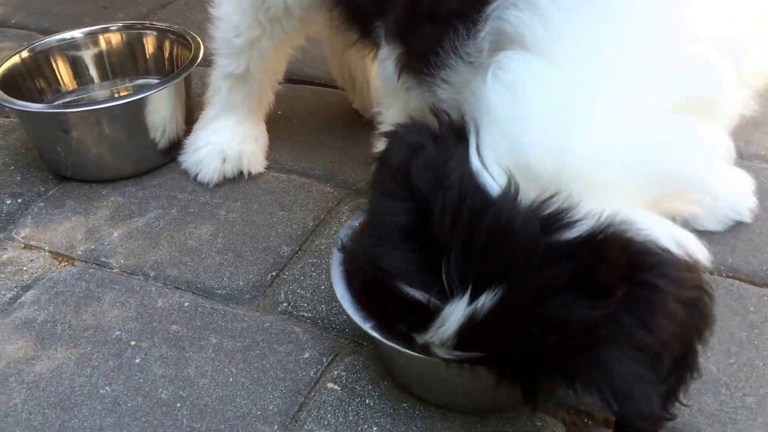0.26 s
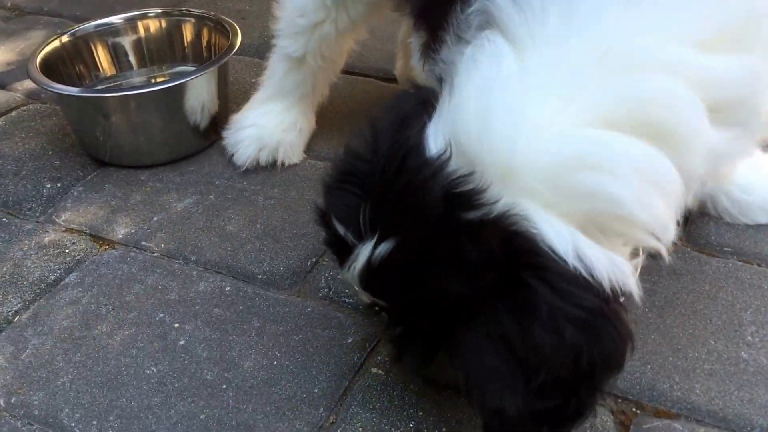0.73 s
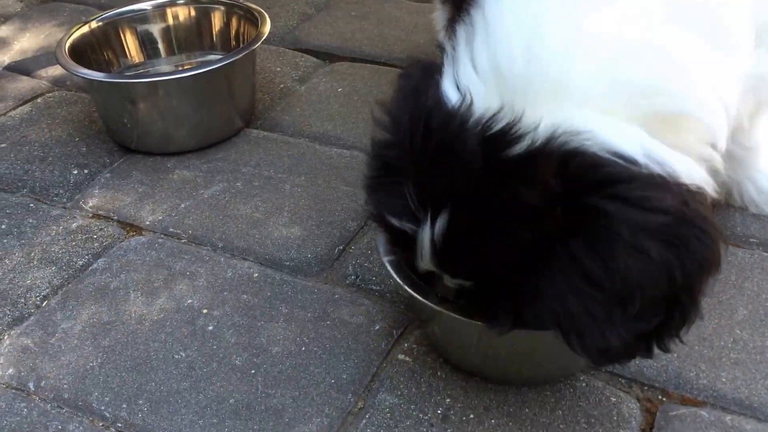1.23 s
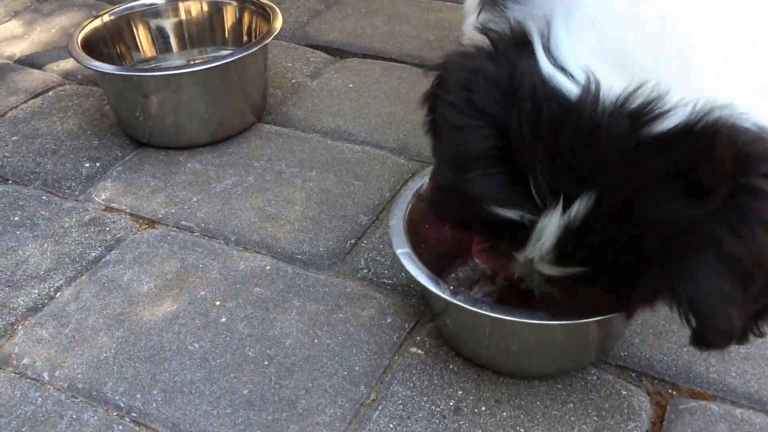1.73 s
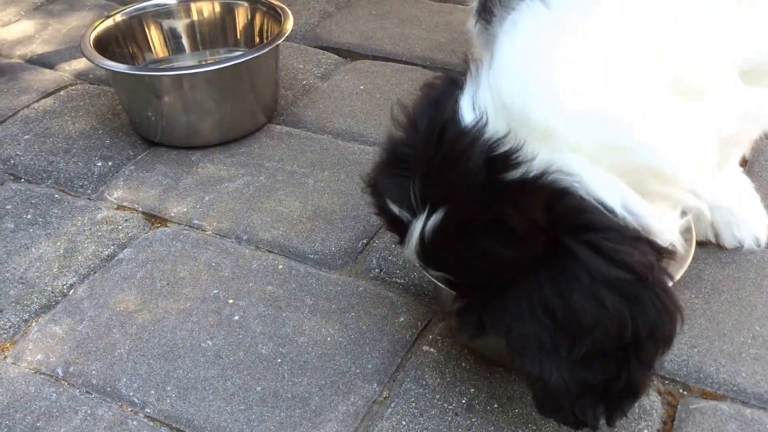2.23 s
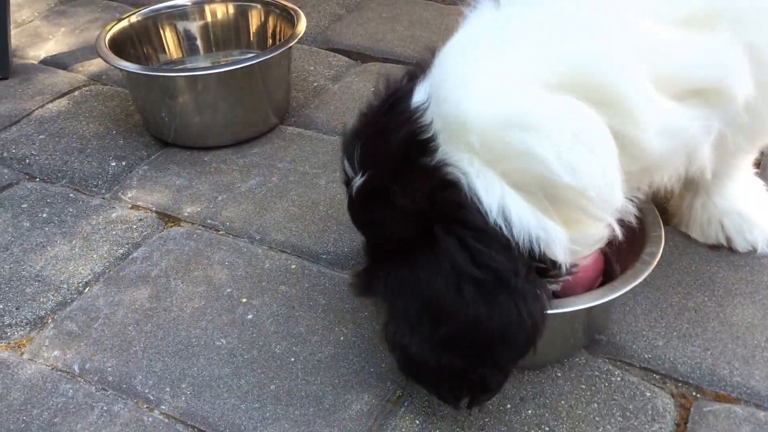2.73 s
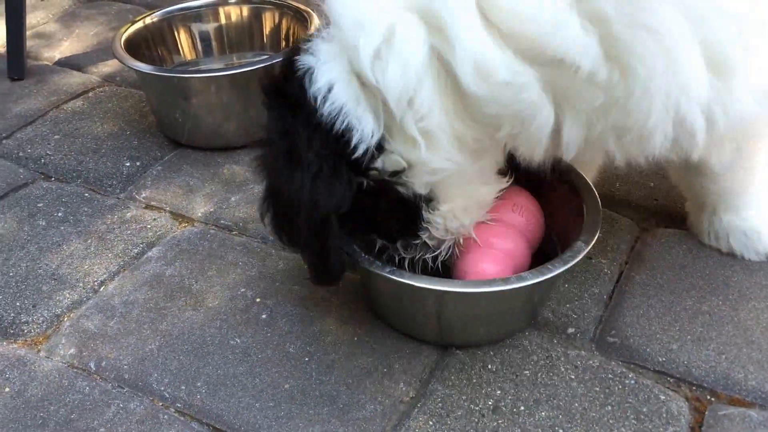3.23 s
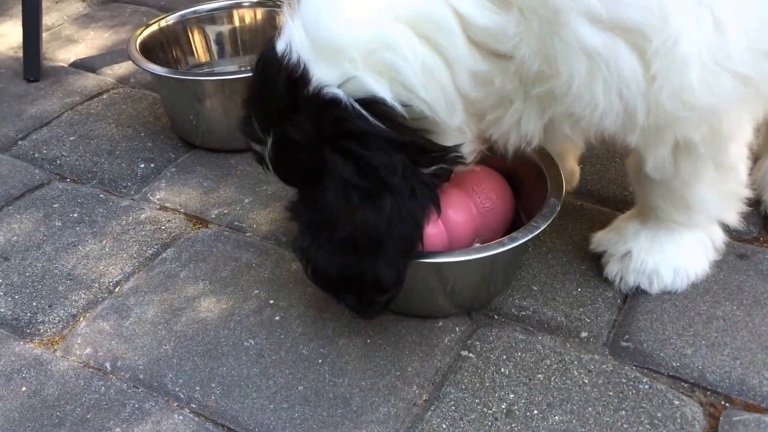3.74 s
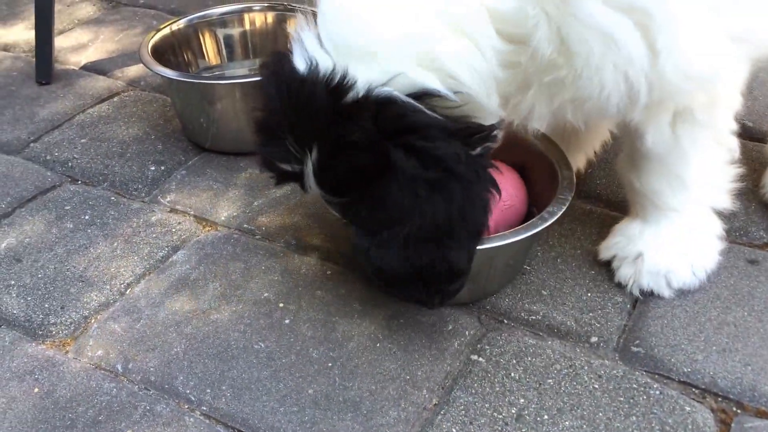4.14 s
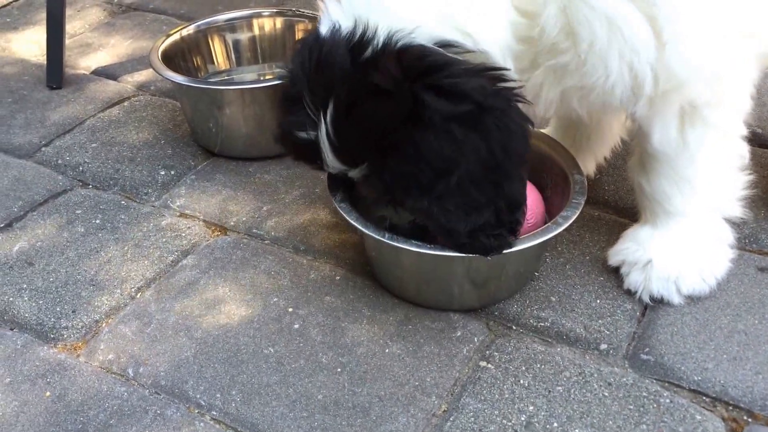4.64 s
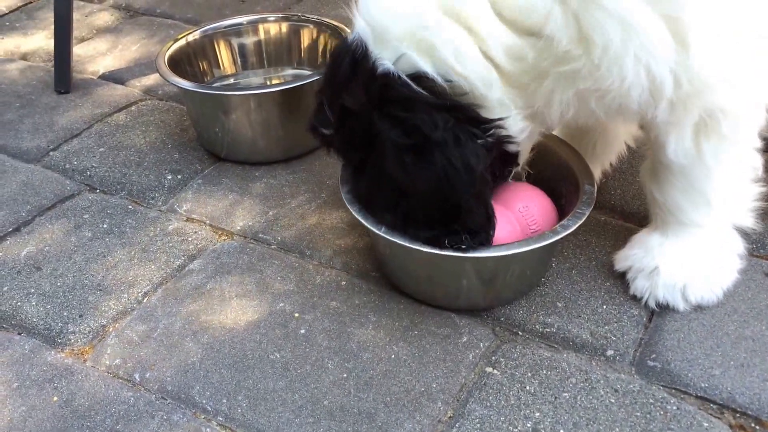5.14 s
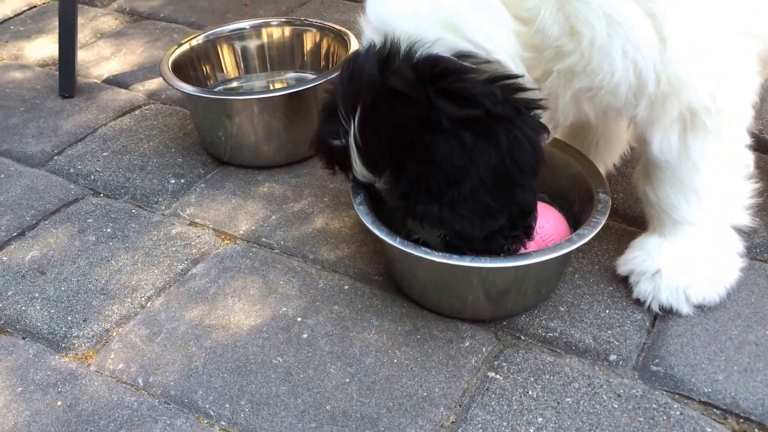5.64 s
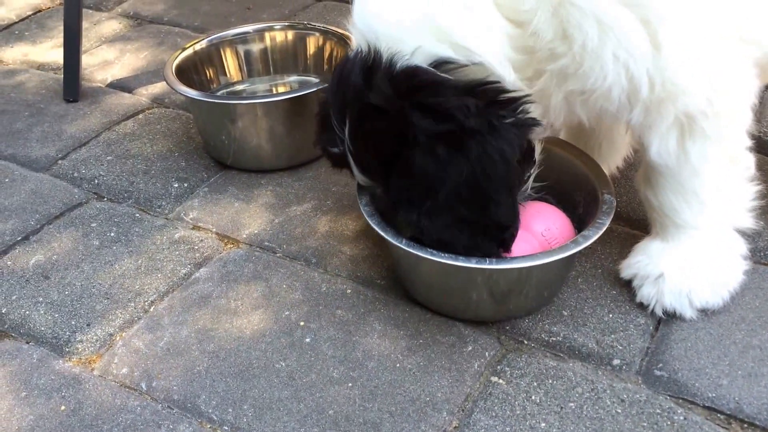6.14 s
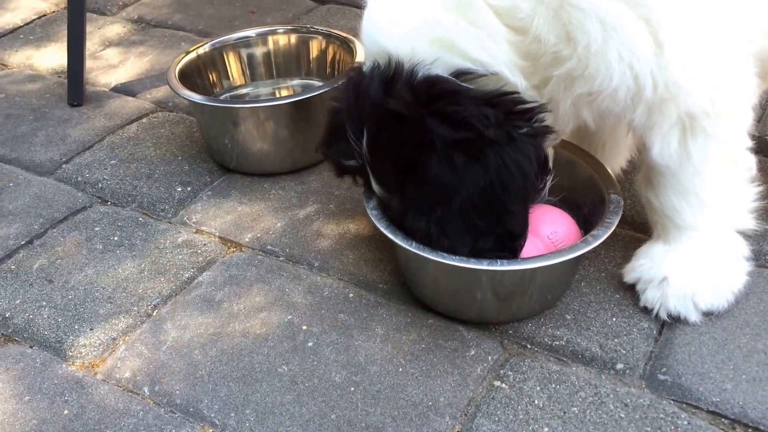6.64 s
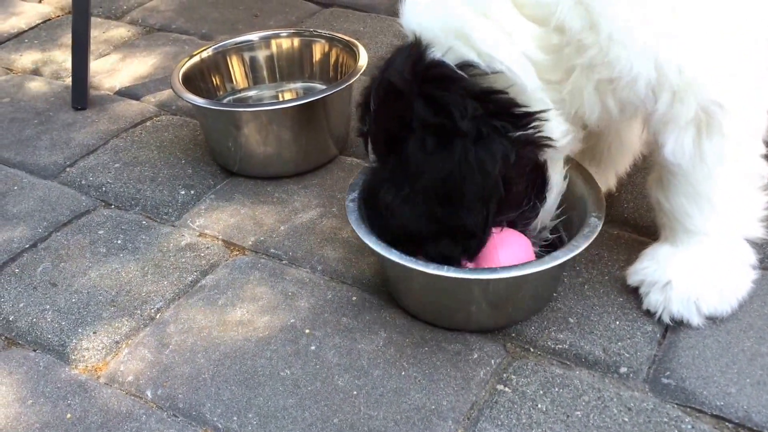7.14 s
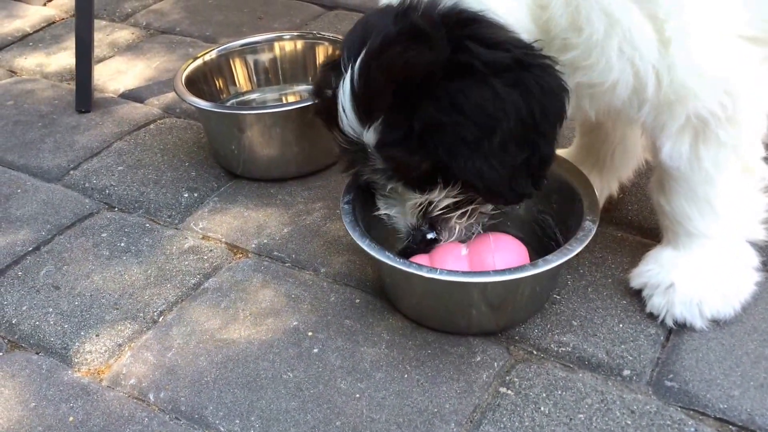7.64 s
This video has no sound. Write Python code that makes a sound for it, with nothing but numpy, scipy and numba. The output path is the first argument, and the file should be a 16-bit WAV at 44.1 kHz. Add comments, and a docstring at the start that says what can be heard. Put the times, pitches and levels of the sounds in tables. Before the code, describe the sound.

A thin metal bowl scrapes and clatters over rough paving as a puppy eats, with knocks, tiny wet licks and a faint distant drone outdoors.

```python
"""On a paved patio a puppy eats from a thin steel bowl, a metre from a hand-held phone.
Its muzzle shoves the bowl over rough stone: noise from ticking grains drives the bowl's modes.
Kibble, teeth and a toy knock the wall: impulses ring the same modes under a short noisy crack.
Dull bumps are low damped swings, licks are tiny decaying sines, a wet slide is swept narrow noise.
Behind it a distant machine drones over suburban air: filtered noise with a puff of wind in the bass."""
import sys
import numpy as np
from scipy import signal
from scipy.fft import rfft, irfft
from scipy.io import wavfile
from scipy.ndimage import uniform_filter1d
from numba import njit

SR = 44100
rng = np.random.default_rng(int(sys.argv[2]) if len(sys.argv) > 2 else 0)


def volts_from_decibels(level):
    """Turn decibel levels (scalar or array-like) into linear amplitude factors."""
    exponent = np.asarray(level, float) / 20
    return 10 ** exponent


def transcribe(u):
    """Save the signal u as a 16-bit wav file named by the first command-line argument.

    u: samples, shape (n,) or (channels, n), limited to [-1, 1]; the rate is SR.
    q: integer samples, one column per channel.
    """
    v = np.clip(np.atleast_2d(u).T, -1, 1)
    q = np.round(v * 32767).astype(np.int16)
    wavfile.write(sys.argv[1], SR, q)


N = 347508
T = np.arange(N) / SR  # s


def level(x, db):
    """Scale to an rms level."""
    return x * volts_from_decibels(db) / np.sqrt(np.mean(x ** 2))


def band(x, lo_hz, hi_hz):
    """Steep band-pass."""
    return signal.sosfilt(signal.butter(3, [lo_hz, hi_hz], "bandpass", fs=SR, output="sos"), x)


def ring(x, hz, t60):
    """One damped mode; a unit impulse starts a sine that falls by 60 dB in t60 seconds."""
    radius = np.exp(-np.log(1000) / (t60 * SR))
    angle = 2 * np.pi * hz / SR
    return signal.lfilter([np.sin(angle)], [1, -2 * radius * np.cos(angle), radius ** 2], x)


@njit
def resonance(x, hz, width):
    """State-variable band-pass with a moving centre, gain 1 there."""
    y = np.empty(len(x))
    band_state, low_state = 0., 0.
    for i in range(len(x)):
        g = np.tan(np.pi * hz[i] / SR)
        k = width / hz[i]
        v = (band_state + g * (x[i] - low_state)) / (1 + g * (g + k))
        band_state = 2 * v - band_state
        low_state = low_state + 2 * g * v
        y[i] = k * v
    return y


def walk(rate):
    """Random levels held 1 / rate s and slewed twice; spread near 1."""
    hold = int(SR / rate)
    steps = np.repeat(rng.standard_normal(N // hold + 1), hold)
    slewed = uniform_filter1d(uniform_filter1d(steps, hold), hold)
    return slewed[:N] * np.sqrt(2)


def turns(spread_db, rate, count):
    """Gains that take turns: each wanders alone, their summed power stays even."""
    gains = np.array([volts_from_decibels(spread_db * walk(rate)) for _ in range(count)])
    return gains / np.sqrt(np.mean(gains ** 2, axis=0))


# spectral shape of the distant air noise: [f/Hz, relative level per Hz/dB]
AIR_SPECTRUM = [(15, -65.5), (25, -23), (71, -6.5), (172, -6.5), (293, -14.5), (344, -14.5), (475, -22),
                (691, -26), (978, -25.5), (1180, -28), (1390, -27.5), (1960, -31.5), (3830, -46),
                (5720, -48.5), (15000, -54)]
# rough hum bands of the machine, before the swells: [f/Hz, width/Hz, level/dB]
HUM_BANDS = [(85, 10, -58.5), (123.55, 14, -60.5)]
# distant traffic swells and sinks: [t/s, level/dB]
TRAFFIC_SWELL = [(0.0, -0.5), (1.47, 2.5), (2.02, -1), (2.5, 1.5), (3.45, 1.5), (4.61, -2), (6.1, -1),
                 (6.69, 4), (6.89, 0), (7.88, -1)]
# the far machinery's bass comes and goes on its own: [t/s, level/dB]
BASS_SWELL = [(0.0, 1.5), (1.5, 1.5), (2.0, -4.5), (2.5, -9), (2.9, -4.5), (3.2, 0.5), (3.6, -1.5),
              (4.6, 2), (6.1, -0.5), (7.88, 2.5)]
# puff of wind on the microphone: [start t/s, attack/s, hold/s, release/s, bass rise level/dB]
WIND_PUFF = (2.53, 0.062, .08, 0.081, 15)


def air(noise_db=-51.5, split_hz=170):
    """Distant traffic and machinery: coloured noise and hum; hiss and bass swell apart, a gust lifts the bass."""
    hz, db = np.transpose(AIR_SPECTRUM)
    f = np.arange(N // 2 + 1) * SR / N
    colour = volts_from_decibels(np.interp(np.log(f + 1), np.log(hz), db))
    noise = irfft(rfft(rng.standard_normal(N)) * colour, N)
    hum = sum(level(band(rng.standard_normal(N), hz - w / 2, hz + w / 2), db) for hz, w, db in HUM_BANDS)
    far = level(noise, noise_db) + hum
    rumble = signal.sosfiltfilt(signal.butter(2, split_hz, fs=SR, output="sos"), far)
    hiss = far - rumble
    swell_db = np.interp(T, *np.transpose(TRAFFIC_SWELL))
    bass_db = np.interp(T, *np.transpose(BASS_SWELL))
    rise_db = WIND_PUFF[4]
    gust_db = np.interp(T, np.cumsum(WIND_PUFF[:4]), [0, rise_db, rise_db, 0])
    return hiss * volts_from_decibels(swell_db) + rumble * volts_from_decibels(bass_db + gust_db)


# wet slide along the wall, falling in pitch: [start t/s, length/s, from f/Hz, to f/Hz, level/dB]
WET_SLIDE = (0.415, 0.05, 2700, 1700, -43)


def slide(width_hz=300.0):
    """Rubbing noise in one narrow resonance that sweeps down."""
    s, length, from_hz, to_hz, db = WET_SLIDE
    along = np.clip((T - s) / length, 0, 1)
    rub = resonance(rng.standard_normal(N), from_hz * (to_hz / from_hz) ** along, width_hz)
    rub = rub * np.sqrt(SR / np.pi / width_hz)  # make up for the narrow band
    return rub * volts_from_decibels(db) * np.sin(np.pi * along)


# the clearest smacks of tongue and lips: [t/s, starting level/dB, f/Hz]
CLEAR_SMACKS = [(0.953, -44.5, 2760), (4.196, -33.5, 2960), (4.637, -45.5, 3810), (5.946, -43, 3110),
                (7.085, -46.5, 4500), (7.107, -41.5, 2300), (7.365, -49.5, 2610)]


def licks(per_s=11.0, lick_db=-59.0, spread_db=4.0, cycles=2.6):
    """Wet ticks of tongue and lips, each a few cycles long: clear smacks among many tiny random ones."""
    when, pitch, size = rng.random((200, 3))[:int(per_s * N / SR)].T
    tiny = np.transpose([when * N / SR, lick_db - spread_db * np.log(size), 2500 * 4.0 ** pitch])
    out = np.zeros(N + 256)
    for s, db, hz in [*CLEAR_SMACKS, *tiny]:
        at = int(s * SR)
        tick = np.sin(2 * np.pi * hz * T[:256]) * np.exp(-T[:256] * hz / cycles)
        out[at:at + 256] += tick * volts_from_decibels(db)
    return out[:N]


# dull bumps of bowl, toy and phone: [t/s, level of the impulse/dB, f/Hz, t60/s]
DULL_BUMPS = [(2.589, -28.5, 104, 0.078), (2.619, -36, 91, 0.06), (2.648, -21.5, 85, 0.024),
              (2.691, -45, 80, .08), (2.721, -35, 90, .08), (2.761, -38, 350, 0.056),
              (2.843, -29, 488, 0.12), (2.902, -28, 368, 0.029), (3.061, -38.5, 346, 0.077),
              (3.426, -32.5, 266, 0.057), (3.514, -26.5, 408, 0.15), (3.522, -27, 528, 0.08),
              (5.55, -36, 342, 0.13), (7.127, -26.5, 345, 0.053)]


def bumps():
    """Soft contacts: a slightly blunted impulse starts one low, quickly damped swing each."""
    out = 0
    for s, db, hz, t60 in DULL_BUMPS:
        blow = np.zeros(N)
        blow[int(s * SR)] = volts_from_decibels(db)
        out = out + ring(uniform_filter1d(blow, size=48), hz, t60)
    return out


# modes of the bowl, t60 before knocks and scraping shorten it: [f/Hz, relative level/dB, t60/s]
BOWL_MODES = [(598.6, 3, 0.037), (652, 5, 0.044), (772, -0.5, 0.041), (900, 7.5, 0.044), (1015, -6, 0.11),
              (1210, 5, 0.024), (1350, -1, 0.021), (1477, -6, .08), (1545, 2.5, 0.075), (1635, -4, 0.26),
              (1720, 2, 0.087), (1904, -11.5, 0.45), (2116, -16, 0.11), (2330, -7, 0.057),
              (2620, -1.5, 0.037), (3082, -5, 0.069), (3330, -6.5, 0.017), (3683, -5, 0.068),
              (4178, -13.5, 0.014), (5140, -1.5, 0.039), (5640, -3.5, 0.099), (5604, 6, 0.014),
              (5920, 6, 0.022), (6710, 1.5, 0.037), (7780, -21.5, 0.0067), (7820, -7.5, 0.081),
              (8240, -9.5, .07), (10800, -25, 0.057), (10600, -17.5, .05), (10700, -23, .05)]
# edges of the four mode families, air inside, base, wall and rim: [f/Hz]
FAMILY_EDGES = [520, 1250, 2250, 4700, 15000]


def family(k):
    """The modes that lie in band k."""
    return [mode for mode in BOWL_MODES if FAMILY_EDGES[k] <= mode[0] < FAMILY_EDGES[k + 1]]


# how freely the wall sounds beside the base as head and chest lean on it: [t/s, level/dB]
WALL_FREEDOM = [(0.0, 2.3), (0.5, -0.5), (0.9, -18), (2.0, -18), (2.6, -17), (3.1, -10), (3.5, -4),
                (4.0, -13), (4.6, -11.5), (5.3, -7.5), (5.8, -4.5), (6.8, -7), (7.3, -4), (7.88, -20)]


def families(s, rim_db, body_db, hz, lean, tilt_db_per_octave=10.5, even_hz=1150):
    """Family levels: pitch splits the body between air and base, the wall follows the base."""
    # the higher the pitch, the more the base sounds instead of the air inside
    tilt_db = lean * np.clip(tilt_db_per_octave * np.log2(hz / even_hz), -10, 10) / 2
    air_db, base_db = body_db - tilt_db, body_db + tilt_db
    wall_db = base_db + np.interp(s, *np.transpose(WALL_FREEDOM))
    return np.array([air_db, base_db, wall_db, rim_db])


# knocks on the bowl: [t/s, strength as relative level/dB, hardness as rim level over strength/dB,
# favoured mode f/Hz]
BOWL_KNOCKS = [(0.541, -23, -8, 749), (0.607, -25.5, -2, 671), (1.001, -56, -3, 576),
               (1.105, -29, 14, 1575), (1.325, -56, -0.5, 1050), (1.648, -41.5, -2, 1720),
               (1.725, -54, 0, 960), (2.082, -40, -4, 945), (2.1, -30.5, -7, 788), (2.136, -38, -6, 582),
               (2.48, -37, -11, 1533), (2.812, -30.5, 2, 1550), (2.864, -37.5, -1, 1560),
               (2.844, -22, -20, 522), (2.903, -22, -9, 698), (2.924, -49, -11, 850),
               (3.048, -42.5, 1, 900), (3.36, -24, 6.5, 990), (3.428, -25.5, -2, 1980), (3.53, -25, 4, 829),
               (3.594, -20, -6, 734), (3.822, -58, 5, 872), (3.889, -48, 19.5, 584), (3.932, -48, 8, 1080),
               (4.11, -20, -4.5, 603), (4.137, -21.5, -10, 564), (4.194, -36, -2.5, 580),
               (4.877, -48, 11, 840), (5.082, -50.5, 8, 918), (5.419, -42, -27, 622), (5.543, -39, -8, 625),
               (5.552, -30, -10.5, 1130), (6.478, -39, -9.5, 1220), (6.787, -49, -6, 945),
               (6.882, -29, -13, 1174), (7.126, -21.5, 11, 1340), (7.489, -63, 2, 816),
               (7.586, -60, 8.5, 766), (7.63, -44.5, 8, 1210), (7.725, -61, 3, 934)]
# crack in each family, weak where the bowl answers with a ring: [noise level/dB, decay constant/s]
BLOW_CRACK = [(-11.5, 0.0021), (-16, 0.0057), (-13, 0.0011), (-3.5, 0.0017)]


def knocks(struck_wall_db=-2.5, spot_db=4.0, rise_s=0.00074, damp=0.72, favour_db=20.0,
           reach=0.059, lag_s=0.00064, rattle_db=-10.5, rattle_s=0.0065):
    """Each blow lands on a new spot and favours the mode that moves most there; a short crack rides on it."""
    s, strength_db, hardness_db, favoured_hz = np.transpose(BOWL_KNOCKS)
    at = ((s + lag_s) * SR).astype(int)
    levels_db = families(s, strength_db + hardness_db, strength_db - 2.5, favoured_hz, 0.49)
    levels_db[2] = levels_db[1] + struck_wall_db  # a knock sounds the wall at a fixed level beside the base
    spot = rng.standard_normal((len(s), len(BOWL_MODES)))
    t = T[:2048]
    out = 0
    for k, (crack_db, crack_s) in enumerate(BLOW_CRACK):
        edges = FAMILY_EDGES[k:k + 2]
        size = volts_from_decibels(levels_db[k])
        rung = 0
        for mode in family(k):
            hz, db, t60 = mode
            nearness = np.exp(-(np.log(hz / favoured_hz) / reach) ** 2)
            blow = np.zeros(N)
            blow[at] = size * volts_from_decibels(db + favour_db * nearness + spot_db * spot[:, BOWL_MODES.index(mode)])
            rung = rung + ring(blow, hz, damp * t60)
        blow = np.zeros(N)
        blow[at] = size
        contact = (1 - np.exp(-t / rise_s)) * np.exp(-t / crack_s)
        # the bowl rattles on the stone for a moment after the blow
        rattle = (1 - np.exp(-t / crack_s)) * np.exp(-t / rattle_s)
        contact = contact + volts_from_decibels(rattle_db) * rattle
        noise = uniform_filter1d(rng.standard_normal(N), size=2)
        crack = level(band(noise, *edges), crack_db)
        out = out + volts_from_decibels(-19) * band(rung, *edges) + crack * signal.oaconvolve(blow, contact)[:N]
    return out


# tilt of the grit over frequency: [f/Hz, relative level/dB]
GRIT_COLOUR = [(500, 3.5), (2600, 2.5), (3200, 1), (4400, -4.5), (5800, 2.5), (9000, -1.5), (15000, -6)]


def grit(push, k, patchy_db, t60=0.025, count=5):
    """Modes too dense to tell apart: a few short random rings, taking turns as the contact moves."""
    f = np.linspace(1, SR / 2, 2049)
    hz, db = np.transpose(GRIT_COLOUR)
    colour = volts_from_decibels(np.interp(np.log(f), np.log(hz), db))
    out = 0
    for share in turns(patchy_db, 18, count=count):
        thicket = rng.standard_normal(2048) * np.exp(-np.log(1000) * T[:2048] / t60)
        thicket = thicket / np.sqrt(np.sum(thicket ** 2))
        thicket = irfft(rfft(thicket, 4096) * colour)
        out = out + signal.oaconvolve(push * share, thicket)[:N]
    lo_hz, hi_hz = FAMILY_EDGES[k:k + 2]
    return band(out, lo_hz, hi_hz) * np.sqrt(SR / 2 / (hi_hz - lo_hz) / count)


# strokes of the bowl over the stone:
# [middle t/s, length/s, rim level/dB, weight on the base as level over the rim/dB, hollow f/Hz]
STROKES = [(0.004, 0.073, -50.5, 3, 1000.0), (0.128, 0.11, -48, 11, 1130), (0.158, 0.11, -42, 2.5, 830.0),
           (0.325, 0.17, -43.5, 6, 1230), (0.451, 0.15, -44.5, -1, 1380.0), (0.583, 0.12, -45.5, 0, 694),
           (0.701, 0.11, -64, 12, 1150.0), (0.872, 0.064, -58.5, 13, 1550),
           (1.018, 0.036, -66.0, 12, 940.0), (1.106, 0.1, -55.5, 9, 1575), (1.23, 0.072, -69, 8.5, 990),
           (1.324, 0.033, -76, 11, 1070.0), (1.616, 0.14, -82.5, 24.5, 780.0),
           (1.672, 0.076, -77.5, 20, 860.0), (1.733, 0.042, -73.5, 15.5, 950.0),
           (1.802, 0.09, -70, 9.5, 1090.0), (1.851, 0.066, -61.0, 8, 940), (2.102, 0.031, -54.5, 3.5, 950),
           (2.141, 0.033, -61, 6, 1020.0), (2.428, 0.053, -64, 12, 1180), (2.501, 0.06, -46.5, 6, 1600),
           (2.566, 0.12, -49.5, 4, 640), (2.602, 0.1, -60.5, 5.0, 960), (2.692, 0.024, -58, 1, 1020.0),
           (2.778, 0.043, -48.5, -5.6, 900.0), (2.844, 0.17, -51, 5.5, 910), (2.926, 0.034, -50, 6, 686),
           (2.975, 0.064, -70.5, 10.5, 1430.0), (3.003, 0.047, -63, 7.5, 826),
           (3.093, 0.076, -40.0, 0.7, 814), (3.165, 0.1, -37, 1.5, 1640.0), (3.207, 0.093, -40.5, 5, 1236),
           (3.358, 0.32, -39.5, 2.4, 1650), (3.532, 0.049, -42.5, 0.5, 820),
           (3.617, 0.18, -42, -1.5, 900.0), (3.621, 0.072, -40.5, 1.2, 1630),
           (3.759, 0.042, -55.5, 1.5, 860), (3.844, 0.063, -63, 1, 1000.0), (3.899, 0.017, -50, -4, 1120.0),
           (3.949, 0.037, -47, -8, 1070.0), (3.98, 0.098, -54, -2, 1040.0), (4.053, 0.077, -70, 8, 870.0),
           (4.129, 0.067, -49.5, 8.8, 1050), (4.204, 0.049, -53, 8, 900), (4.313, 0.073, -47.5, -2.5, 720),
           (4.422, 0.071, -54.5, 10.5, 1230), (4.827, 0.035, -66, -1, 940), (4.881, 0.083, -64, 4.5, 1000),
           (4.885, 0.018, -56, -6.9, 960.0), (4.924, 0.056, -66.5, 11, 920.0), (5.014, 0.14, -62, 6, 980),
           (5.059, 0.067, -57.5, 2.5, 760.0), (5.108, 0.044, -61, 5, 730), (5.5, 0.044, -71, 3, 1160.0),
           (5.572, 0.05, -45, 10, 1150.0), (5.593, 0.063, -50, 10.5, 864), (5.637, 0.06, -71.6, 10, 870.0),
           (5.86, 0.054, -68.5, 10.3, 860.0), (6.11, 0.073, -66, 7.5, 780.0), (6.238, 0.077, -59, 9.5, 700),
           (6.318, 0.065, -73.5, 13, 950), (6.489, 0.025, -68.5, 13.5, 1150),
           (6.623, 0.086, -67, 14, 1030.0), (6.893, 0.058, -52.5, 11.5, 1140),
           (7.141, 0.12, -67, 7, 1210.0), (7.155, 0.054, -54.5, 1, 1100), (7.2, 0.1, -56.5, 14.5, 1050),
           (7.255, 0.092, -40.5, 4.5, 1160), (7.278, 0.075, -44.5, 9, 1060), (7.36, 0.142, -88, 10, 1350.0),
           (7.451, 0.056, -67.5, 0, 1110.0), (7.64, 0.04, -55, 4.5, 980), (7.664, 0.089, -62.5, 3, 985)]


def shove(rise_share=0.49, end_db=-12):
    """Family gains and hollow pitch: strokes add their power, the strongest dominates the pitch."""
    step = T[::64]
    s, length, rim_db, weight_db, hz = np.transpose(STROKES)
    # a stroke bites a little faster than it lets go, on a bell curve that is end_db down at its ends
    since = (step - s[:, None]) / length[:, None] + .5 - rise_share
    since = np.where(since < 0, since / rise_share, since / (1 - rise_share))
    swell = volts_from_decibels(2 * end_db * since ** 2) + 1e-30  # in power
    power = volts_from_decibels(2 * families(s, rim_db, rim_db + weight_db - 2, hz, 1)) @ swell
    body = volts_from_decibels(2 * (rim_db + weight_db))[:, None] * swell
    hollow_hz = np.exp(np.log(hz) @ body / body.sum(axis=0))
    gains = np.array([np.interp(T, step, np.sqrt(p)) for p in power])
    return gains, np.interp(T, step, hollow_hz)


# broad grit noise against the ringing, one per family: [level/dB]
GRIT_MIX = [-3, -9, -1, 4.5]


def scraping(spread_db=2.0, snag_db=2.0, roam_db=9.5, patchy_db=14.5, damp=0.41,
             hollow_db=-6.5, hollow_width_hz=71.0):
    """Sand grains under the base tick densely; the contact roams, so each mode comes and goes."""
    grains = rng.standard_normal(N) * volts_from_decibels(spread_db * rng.exponential(size=N))
    grains = level(grains * volts_from_decibels(snag_db * walk(120)), 0)
    gain, hollow_hz = shove()
    out = 0
    for k in range(4):
        push = grains * gain[k]
        # pressed onto the stone, the bowl rings shorter
        modes = [(hz, db, damp * t60) for hz, db, t60 in family(k)]
        # unit noise leaves a mode with this power
        power = sum(volts_from_decibels(2 * db) * t60 * SR / (4 * np.log(1000)) for _, db, t60 in modes)
        shares = turns(roam_db, 20, count=len(modes))
        rung = 0
        for share, (hz, db, t60) in zip(shares, modes):
            rung = rung + ring(push * share * volts_from_decibels(db), hz, t60)
        rough = volts_from_decibels(GRIT_MIX[k]) * grit(push, k, patchy_db)
        out = out + volts_from_decibels(-3.0) * (rung / np.sqrt(power) + rough)
    # the hollow between muzzle and bowl glides in pitch as the head moves
    push = grains * np.where(hollow_hz < FAMILY_EDGES[1], gain[0], gain[1])
    hollow = resonance(push, hollow_hz, hollow_width_hz) * np.sqrt(SR / np.pi / hollow_width_hz)
    return out + volts_from_decibels(hollow_db) * hollow


def scene():
    """The small bowl radiates no bass; its sounds gain quick echoes off paving and house wall."""
    no_bass = signal.cheby2(6, 40, 365, "highpass", fs=SR, output="sos")
    bowl = signal.sosfilt(no_bass, scraping() + knocks())
    near = bowl + bumps() + licks() + slide()
    # echoes as a noise tail with a t60 of 0.05 s
    tail = rng.standard_normal(8192) * np.exp(-np.log(1000) * T[:8192] / 0.05)
    wet = signal.fftconvolve(near, tail / np.sqrt(np.sum(tail ** 2)))[:N]
    return (near + volts_from_decibels(-13.0) * wet + air())[None]


def band_limit(x):
    """A steep low-pass at the top of the band."""
    return signal.sosfilt(signal.butter(12, 16490, fs=SR, output="sos"), x)


def record(dry):
    """The phone cuts the top steeply above 15.2 kHz."""
    cut = signal.sosfilt(signal.ellip(8, .2, 40, 15200, fs=SR, output="sos"), dry)
    return band_limit(cut)


dry = scene()
out = record(dry)
transcribe(out)
```